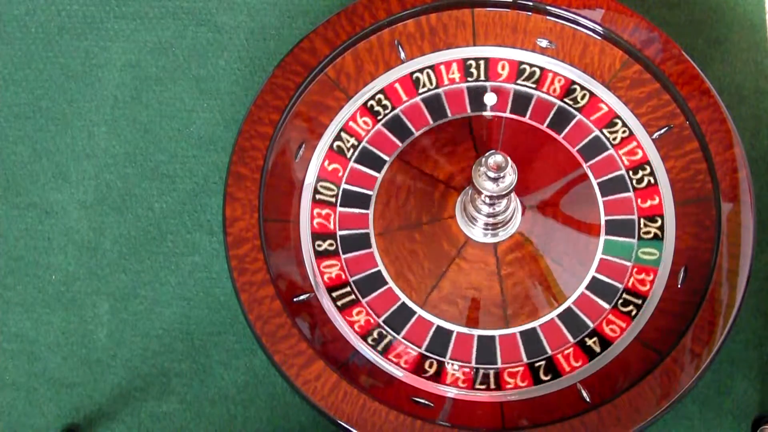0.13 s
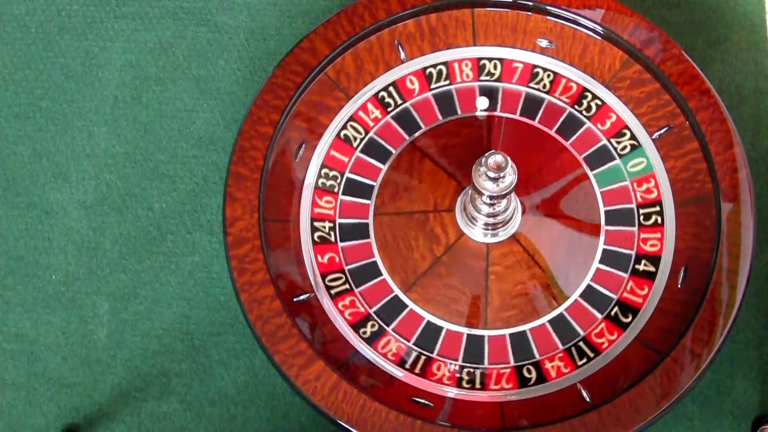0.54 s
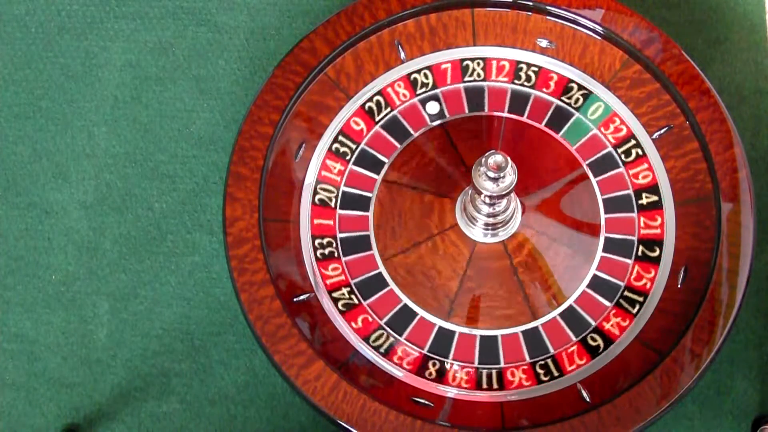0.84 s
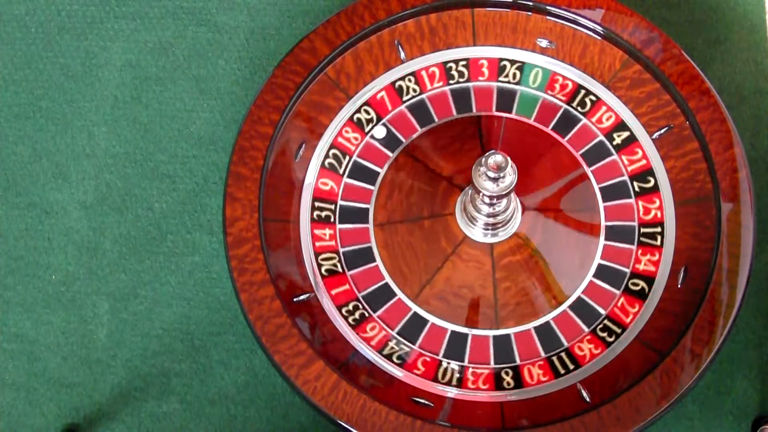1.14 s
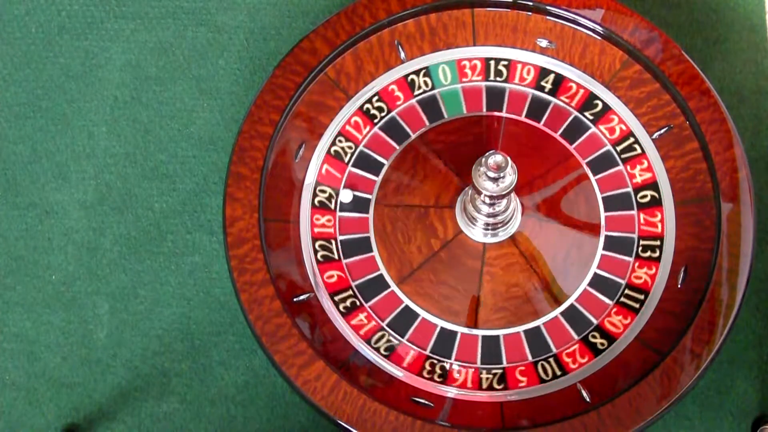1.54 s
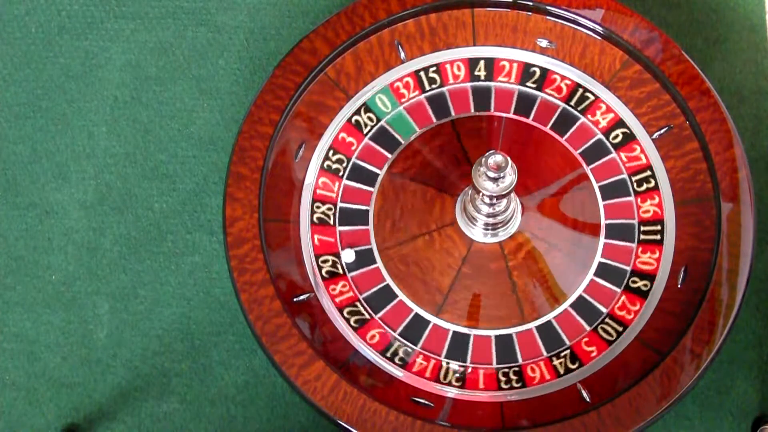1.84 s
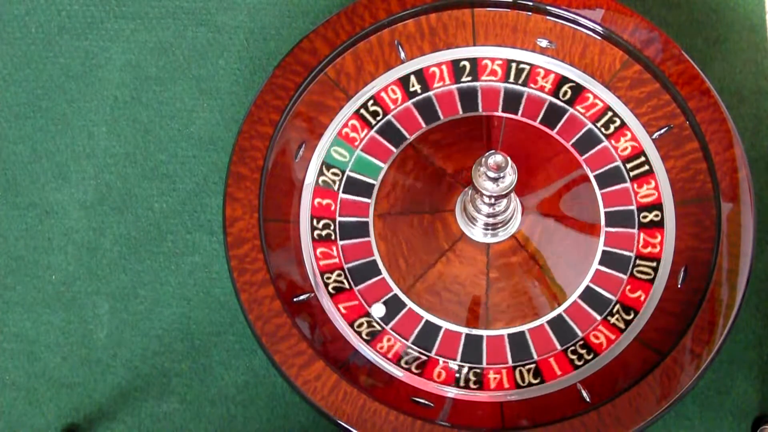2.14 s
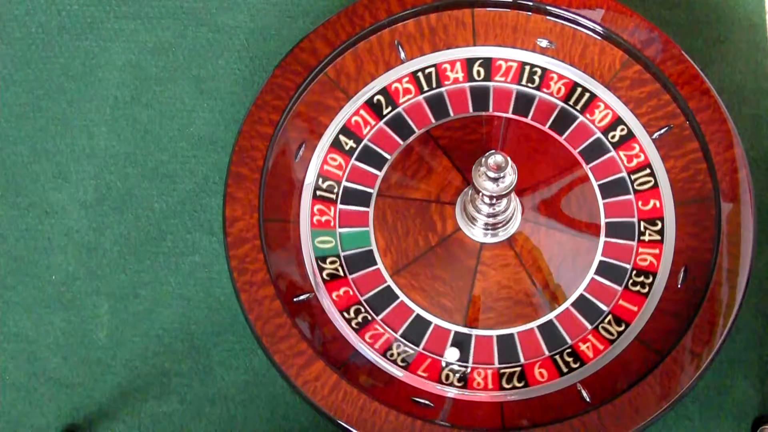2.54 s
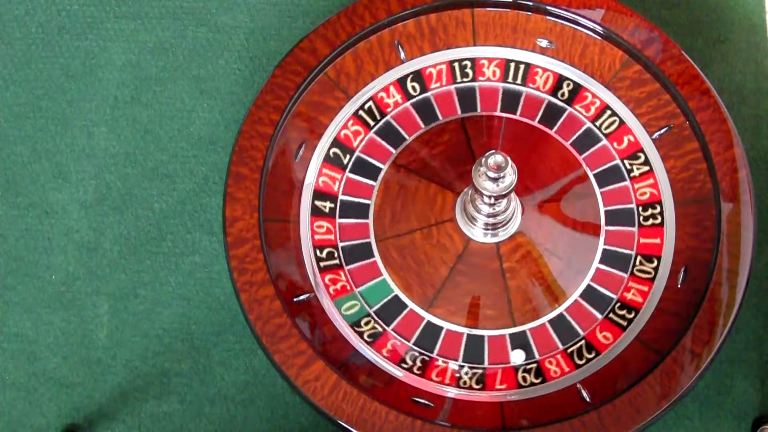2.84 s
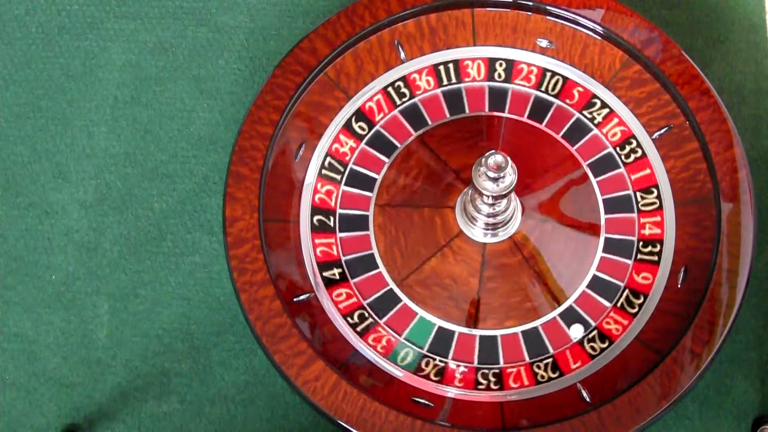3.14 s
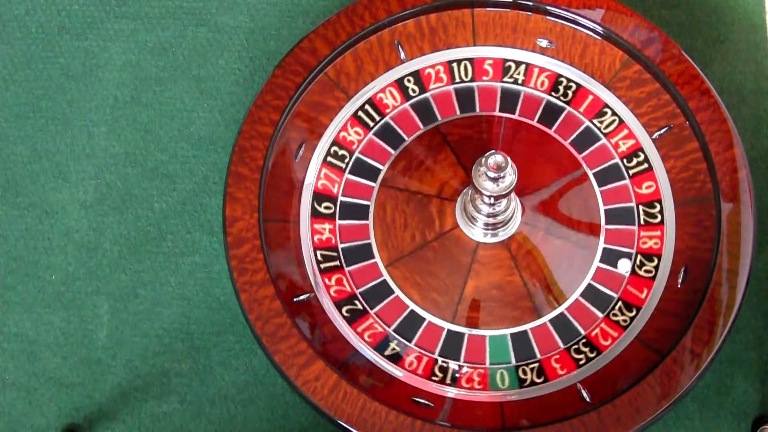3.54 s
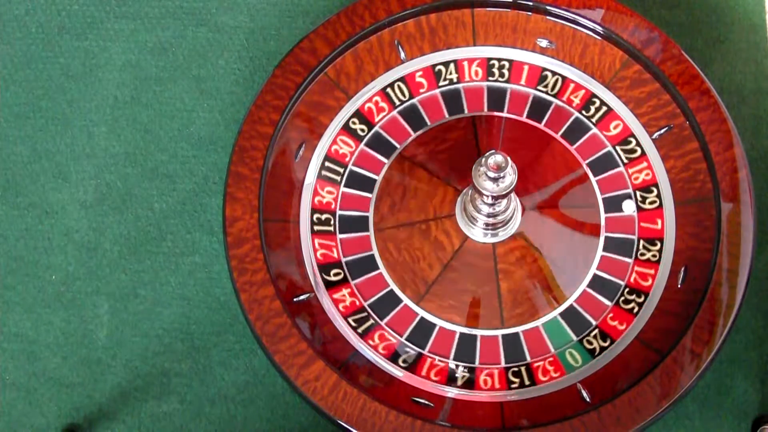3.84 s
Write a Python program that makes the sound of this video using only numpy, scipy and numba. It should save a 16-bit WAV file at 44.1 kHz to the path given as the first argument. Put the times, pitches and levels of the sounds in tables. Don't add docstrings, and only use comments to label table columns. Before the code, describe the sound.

A roulette ball rattles in a wooden wheel, its dense ringing knocks thinning into softer skids and a last faint tick; then quiet indoor hiss and low rumble, heard close in wide stereo.

```python
import sys
import numpy as np
from scipy import signal
from scipy.fft import rfft, irfft
from scipy.io import wavfile
from scipy.ndimage import uniform_filter1d
from numba import njit

SR = 44100
rng = np.random.default_rng(int(sys.argv[2]) if len(sys.argv) > 2 else 0)


def wrap_up_sound(samples):
    columns = np.atleast_2d(samples).T
    tamed = np.clip(columns, -1, 1)
    steps = np.round(tamed * 32767).astype(np.int16)
    wavfile.write(sys.argv[1], SR, steps)


def gain_from_db(level_db):
    decades = np.asarray(level_db, float) / 20
    return 10 ** decades


N = 176400
T = np.arange(N) / SR
ACTIVE = int(1.8 * SR)
LONGEST_T60_S = 0.3
OPPOSITE = np.array([[1], [-1]])


def level(x, db):
    return x * gain_from_db(db) / np.sqrt(np.mean(x ** 2))


def walk(rate_hz):
    hold = int(SR / rate_hz)
    steps = np.repeat(rng.standard_normal(N // hold + 1), hold)
    smooth = uniform_filter1d(uniform_filter1d(steps, hold), hold)
    return level(smooth[:N], 0)


def band(x, lo_hz, hi_hz):
    return signal.sosfilt(signal.butter(2, [lo_hz, hi_hz], "bandpass", fs=SR, output="sos"), x)


def loss_per_sample(t60_s):
    return np.log(1000) / t60_s / SR


def coloured(table, flicker_db):
    hz = np.fft.rfftfreq(N, 1 / SR) + 1
    table_hz, table_db = np.array(table).T
    colour = gain_from_db(np.interp(np.log(hz), np.log(table_hz), table_db))
    spec = rfft(rng.standard_normal(N)) * colour * np.minimum(hz / table_hz[0], 1) ** 2
    out = np.zeros(N)
    for octave in range(4, 15):
        share = np.clip(1 - abs(np.log2(hz) - octave), 0, 1)
        out += irfft(spec * share, N) * gain_from_db(flicker_db * walk(3.3))
    return out


# pitch_hz, level_db (per Hz)
AIR_MID = [(22, -1), (111, -3.5), (300, -5.5), (400, -8.5), (1000, -17), (2400, -27), (4500, -30.5),
           (15800, -31.5)]
# pitch_hz, level_db (per Hz)
AIR_SIDE = [(22, 3), (300, -4), (1000, -10), (1700, -13), (2400, -18), (6000, -18), (12000, -19),
            (15800, -19.5)]
# pitch_hz, width_hz, level_db
HUMS = [(119.8, 12.3, -68.5), (299.4, 39, -68.5)]


def air():
    mid = level(coloured(AIR_MID, flicker_db=0.5), -56.5)
    side = level(coloured(AIR_SIDE, flicker_db=0.5), -55)
    for hz, width_hz, db in HUMS:
        hum = band(rng.standard_normal(N), hz - width_hz / 2, hz + width_hz / 2)
        mid += level(hum, db) * gain_from_db(0.736 * walk(2.22))
    beat = 1 + 0.4 * np.sin(2 * np.pi * 13 * T)
    whine = np.sqrt(2) * np.sin(2 * np.pi * 15734.5 * T) * beat
    return mid + gain_from_db(-75.5) * whine + (side + gain_from_db(-70.5) * whine) * OPPOSITE


# start_s, chatter_level_db, extra_drive_of_singing_db
ROLL = [(0, -32, 8.5), (.3, -39.5, -3.5), (.55, -35, -3.5), (.6, -41, 3.5), (.8, -40.5, -4.5),
        (.86, -52.5, 13.5), (.985, -62, 11), (1.0, -39, 14.5), (1.04, -44.5, 17.5), (1.11, -51, 18),
        (1.13, -57, 20), (1.2, -71, 25.5), (1.3, -89, 12), (1.495, -77, 15), (1.51, -50.5, 17),
        (1.54, -66.5, 13), (1.56, -74.5, 7.5), (1.7, -100, 2)]


def rolling(column=1):
    table = np.array(ROLL)
    return np.interp(T, table[:, 0], table[:, column])


def chatter():
    hit = rng.random(N) < 600 / SR
    size = gain_from_db(4 * rng.exponential(size=N)) * np.sign(rng.standard_normal(N))
    return level(hit * size, 0) * gain_from_db(rolling())


# start_s, peak_db, extra_drive_of_bowl_db, brightness_db
KNOCKS = [(0.002, -9.5, -12, 11.5), (0.072, -43.5, 7, -13), (0.093, -13.5, -13, 7.5), (0.162, -16, -2.5, 9),
          (0.229, -11.5, -1, 6.5), (0.249, -20, -9.5, 11.5), (0.311, -7.5, -18.5, 1.5),
          (0.333, -17, -1.5, -4), (0.387, -9.5, -11, 9), (0.411, -17.5, 2, 7), (0.45, -15.5, -4.5, -7),
          (0.509, -21, -7, -1.5), (0.584, -15, -5, 5), (0.621, -18, -4, 1), (0.649, -19, -17, 3),
          (0.699, -21, -1.5, 1.5), (0.726, -16.5, -28, 1.5), (0.756, -23, -20, 1), (0.781, -24.5, 7, -12),
          (0.832, -33.5, 12.5, -11), (0.997, -39, 16.5, -16), (1.022, -32.5, 0, 3), (1.056, -38, 16, 1),
          (1.503, -53, 15, -8), (0.027, -38.5, 1, 5), (0.048, -29.5, 4, 8.5), (0.136, -27, 0, 4.5),
          (0.207, -33, -3.5, 7), (0.276, -28, -1, -1), (0.478, -20.5, -9, 7.5), (0.532, -26, -12, -8),
          (0.551, -29, -12, -4), (0.672, -29.5, 0, 3.5), (0.862, -36.5, 0, -2), (1.008, -50.5, 3, -3),
          (1.036, -39, -3, -4), (1.216, -55.5, 7, -3), (1.524, -46.5, 4, -12), (1.535, -49.5, 14.5, -8)]


def strikes(db):
    start_s, peak_db, _, _ = np.transpose(KNOCKS)
    x = np.zeros(N)
    x[(start_s * SR).astype(int)] = gain_from_db(peak_db + db)
    return x


def fade(x, t60_s):
    return signal.lfilter([1], [1, -np.exp(-loss_per_sample(t60_s))], x)


@njit
def mode(x, pole, damp):
    z, out = 0j, np.empty(len(x), np.complex128)
    for i in range(len(x)):
        z = z * pole * damp[i] + x[i]
        out[i] = z
    return out


def at_ports(z, lead_rad, pan_db):
    left = gain_from_db(pan_db / 2) * (z * np.exp(0.5j * lead_rad)).imag
    right = gain_from_db(-pan_db / 2) * (z * np.exp(-0.5j * lead_rad)).imag
    return np.array([left, right])


def ring(pitches, modes, extra_db, roll, kept, rise_s):
    out, chance = np.zeros((2, N)), rng.standard_normal((len(KNOCKS), len(modes)))
    push = np.hanning(int(0.00024 * SR) + 3)
    damp = np.where(strikes(0) > 0, kept, 1.0)
    buzz = fade(strikes(extra_db - 21.5), 0.13) * rng.standard_normal(N)
    shake = (roll + buzz)[:ACTIVE]
    slow = np.exp(-1 / (rise_s * SR))
    for k, (hz, (db, t60_s, lead_rad, pan_db)) in enumerate(zip(pitches, modes)):
        loss = loss_per_sample(min(t60_s, LONGEST_T60_S))
        turn = np.exp(2j * np.pi * hz / SR)
        spot_db = 2 * chance[:, k]
        hits = np.convolve(strikes(extra_db + spot_db - 4.5)[:ACTIVE], push / push.sum())[:ACTIVE]
        drive = hits + shake * np.sqrt(2 * loss) + 1e-18
        z = gain_from_db(db) * mode(drive, turn * np.exp(-loss), damp)
        z = (1 - slow) * mode(z, slow * turn, np.ones(ACTIVE))
        out[:, :ACTIVE] += at_ports(z, lead_rad, pan_db)
    return out


BOWL_HZ = [145, 215, 285, 365, 540, 873, 907, 993, 1070, 1103]
# level_db, t60_s, left_leads_rad, left_minus_right_db
BOWL = [(-24, 0.24, -1.5, -2.5), (-23.5, 0.24, -1.5, -7), (-28.5, 0.34, -1, -4), (-29, 0.51, 2.24, -16.5),
        (-27.5, 0.067, 0.9, -12.5), (-10, 0.47, 0.65, 4), (-16, 0.3, -2.5, -10.5), (-26.5, 0.22, -1.8, 8),
        (-15, 0.17, -2, -7), (-13.5, 0.17, -2.5, -2)]


def bowl(roll):
    bowl_db = np.array(KNOCKS)[:, 2]
    return ring(BOWL_HZ, BOWL, bowl_db, roll, kept=0.72, rise_s=0.0034)


WHEEL_HZ = [1370, 1460, 1535, 1603, 1686, 1770, 1965, 2010, 2127, 2366, 2404, 2445, 2514]
# level_db, t60_s, left_leads_rad, left_minus_right_db
WHEEL = [(-22.5, 0.19, -4, 6.5), (-10.5, 0.38, -3, -4), (-10, 0.09, -9, 1), (-18, 0.1, -3, -4),
         (-3.5, 0.15, -1.5, -7), (-19, 0.17, 4.5, 4), (-8.5, 0.067, 1, -7), (-10, .15, -5, -6),
         (-9, 0.056, 2.5, -5.5), (-33, 0.197, -14.5, -3), (-11.5, .15, -6, 5.7), (-2, 0.085, -2.5, 4.5),
         (-5, 0.34, -3, -5.5)]


def wheel_body(roll):
    return ring(WHEEL_HZ, WHEEL, 0, roll, kept=0.42, rise_s=0.00027)


FRETS_HZ = [3130, 3192, 3265, 3350, 3450, 3526, 3600, 3670, 3735, 3830, 3920, 4060, 4290, 4650]
# level_db, t60_s, left_leads_rad, left_minus_right_db
FRETS = [(-22, 0.044, -4, -1.5), (-2, 0.048, -3, -1.2), (-12, 0.068, -3, -0.96), (-8, 0.041, -4, -0.87),
         (-15.5, 0.092, -1, -1.5), (-20.5, 0.067, 2.7, -1.05), (-20, 0.094, 3, -0.95),
         (-19.5, .06, 3.5, -1), (-16, .09, -2, -2.1), (-17, .06, -2.5, -.9), (-38, 0.052, -4, -0.76),
         (-26, 0.048, -6, -1), (-20.5, 0.15, -2.5, -1.2), (-18.5, .06, -2.5, -1)]


def frets(roll):
    bright_db = np.array(KNOCKS)[:, 3]
    return ring(FRETS_HZ, FRETS, bright_db, roll * gain_from_db(-3), kept=0.42, rise_s=0.00085)


# pitch_hz, width_hz, level_db
CLATTER = [(370, 390, -19.5), (1073, 100, -9.5), (1574, 290, -10), (1950, 375, -12), (2437, 130, -8),
           (3256, 310, -9), (3680, 150, -14.5), (4650, 790, -23)]


def clatter():
    out, roll = np.zeros((2, N)), gain_from_db(6 + rolling())
    bright_db = np.array(KNOCKS)[:, 3]
    for hz, width_hz, db in CLATTER:
        env = fade(strikes(-8.5 + bright_db * (hz > 2800)), 0.085) + roll
        noise = env[:ACTIVE] * rng.standard_normal((2, ACTIVE))
        crowd = band(noise, hz - width_hz / 2, hz + width_hz / 2)
        mid, side = crowd * gain_from_db(db) * np.sqrt(SR / width_hz) / 2
        high = 1 / (1 + (860 / hz) ** 3)
        out[:, :ACTIVE] += np.sqrt(1 - 0.92 * high) * mid + np.sqrt(high) * side * np.array([[1], [-1.15]])
    return out


# start_s, length_s, drive_of_high_singing_db, drive_of_low_singing_db
SKIDS = [(.003, 0.049, -15.5, -13.5), (0.092, 0.043, -19, -16), (0.156, .043, -22, -24),
         (0.221, 0.046, -18, -18.5), (0.306, 0.043, -22, -22), (0.376, 0.035, -19, -18),
         (0.449, 0.067, -25.5, -22.5), (0.585, 0.07, -19, -20.5), (0.651, 0.057, -24, -22),
         (0.718, 0.042, -20.5, -35), (0.767, 0.044, -26.5, -22), (0.822, 0.035, -39, -25.5),
         (1.005, 0.048, -29, -26), (1.047, 0.06, -29.5, -26.5), (1.139, 0.034, -51, -39),
         (1.19, .07, -46.5, -45), (1.498, 0.022, -47, -37), (1.53, .022, -49, -30),
         (1.563, 0.035, -52, -44)]


def skids(column):
    env = np.zeros(ACTIVE)
    for row in SKIDS:
        start_s, length_s = row[:2]
        t = T[:ACTIVE] - start_s
        grow = 1 - np.exp(-np.maximum(t, 0) / 0.008)
        die = np.exp(-np.log(1000) * np.maximum(t - length_s, 0) / 0.045)
        env += gain_from_db(row[column]) * grow * die
    return env


SOFT_HZ = [362, 540, 873, 1600, 2505]
# level_db, t60_s, left_leads_rad, left_minus_right_db
SOFT = [(-16.5, 0.59, -0.5, 1), (-19.5, 0.21, 1, 0.28), (-11.5, 0.15, -0.66, 3), (-1, 0.13, -3, -2),
        (-13.5, 0.22, -3.6, -2.2)]
SKID_MODES_HZ = (873, 1600)


def singing():
    out, drive = np.zeros((2, N)), gain_from_db(rolling() + rolling(column=2))
    steady = loss_per_sample(0.5)
    high, low = skids(column=2), skids(column=3)
    for hz, (db, t60_s, lead_rad, pan_db) in zip(SOFT_HZ, SOFT):
        t60_s = min(t60_s, LONGEST_T60_S)
        pole = np.exp(2j * np.pi * hz / SR - steady)
        z = mode(rng.standard_normal(ACTIVE), pole, np.ones(ACTIVE)) * np.sqrt(2 * steady)
        env = fade((drive * loss_per_sample(t60_s) + strikes(-18.5))[:ACTIVE], t60_s)
        if hz in SKID_MODES_HZ:
            env = gain_from_db(-6) * env + (high if hz > 1200 else low)
        z = gain_from_db(db) * env * z / abs(z) ** 0.9
        out[:, :ACTIVE] += at_ports(z, lead_rad, pan_db)
    return out


def ticks():
    bright_db = np.array(KNOCKS)[:, 3]
    env = fade(strikes(bright_db - 50.5), 0.2) + gain_from_db(-31 + rolling())
    env[:ACTIVE] += gain_from_db(-43.5) * skids(column=2)
    mid, side = band(rng.standard_normal((2, N)), 4800, 0.4 * SR) * env
    return gain_from_db(-1) * mid + side * OPPOSITE


def room(x):
    t = T[:SR // 2]
    tail = band(rng.standard_normal((2, len(t))), 104.6, 4070)
    tail = tail * np.exp(-np.log(1000) * t / 0.31) * np.minimum(t / 0.011, 1)
    tail = tail / np.sqrt((tail ** 2).sum(1, keepdims=True))
    return gain_from_db(-18) * signal.fftconvolve(x, tail, axes=1)[:, :N]


def scene():
    roll = chatter()
    wheel = bowl(roll) + wheel_body(roll) + frets(roll) + clatter() + singing()
    for _ in range(2):
        wheel = band(wheel, 121.3, 4020)
    return wheel + room(wheel) + ticks() + air()


def band_limit(x):
    return signal.sosfilt(signal.butter(12, 15920, fs=SR, output="sos"), x)


# pitch_hz, width_hz, depth (0-1)
NOTCHES = [(2854, 1040, 0.81), (4900, 270, 0.4)]


def record(dry):
    mix = signal.sosfilt(signal.ellip(10, 0.2, 80, 15850, fs=SR, output="sos"), dry)
    for hz, width_hz, depth in NOTCHES:
        mix = mix - depth * signal.lfilter(*signal.iirpeak(hz, hz / width_hz, SR), mix)
    return band_limit(mix)


dry = scene()
out = record(dry)
wrap_up_sound(out)
```